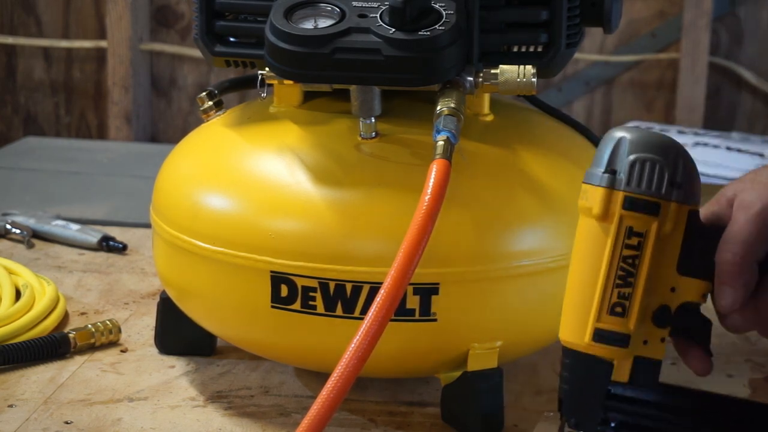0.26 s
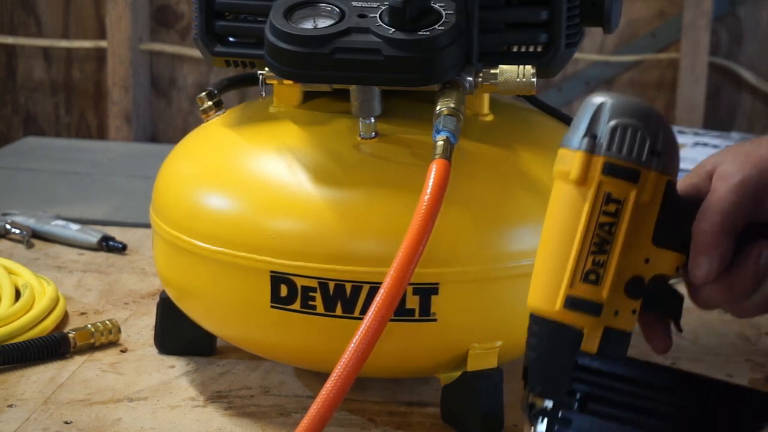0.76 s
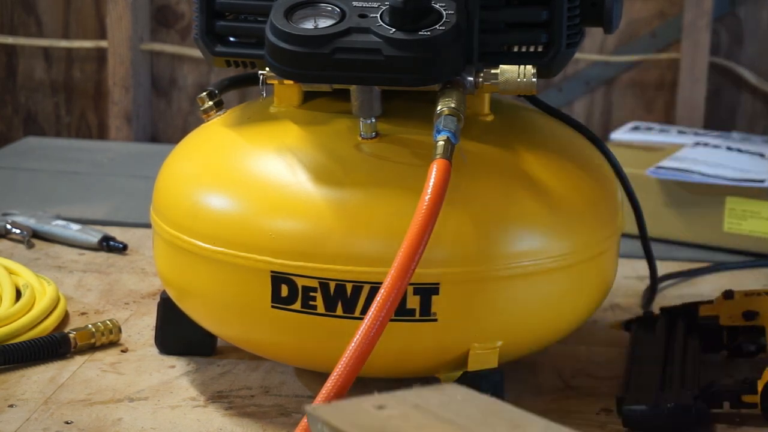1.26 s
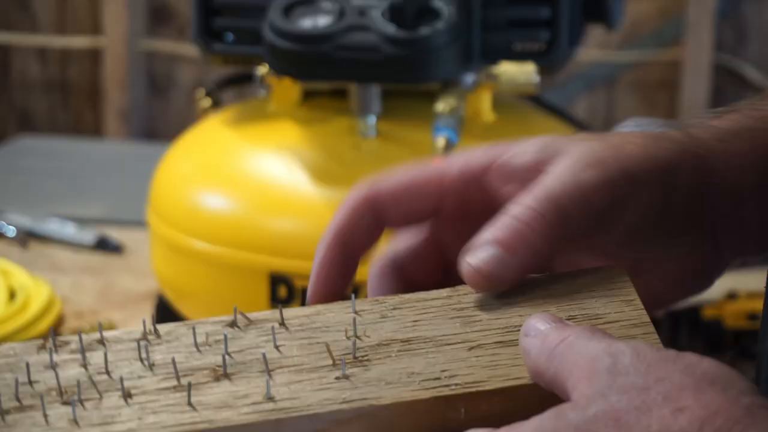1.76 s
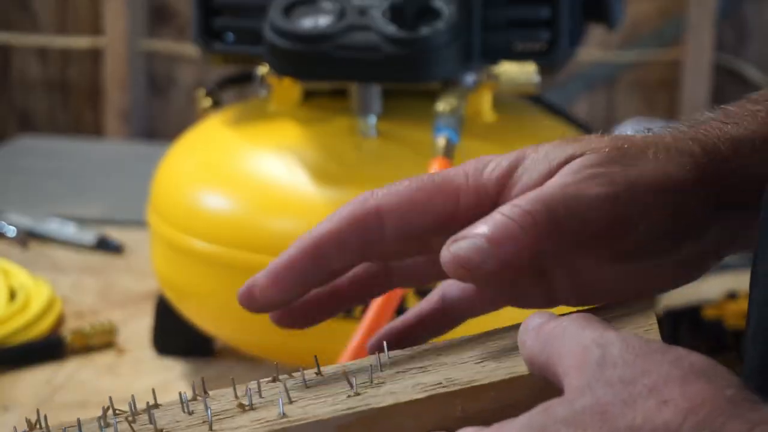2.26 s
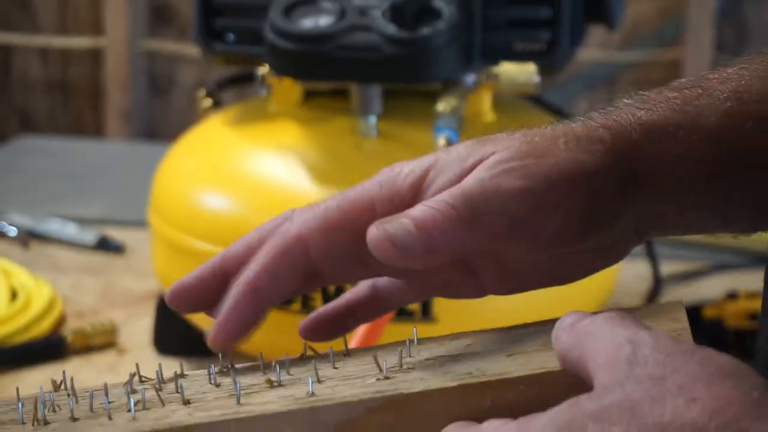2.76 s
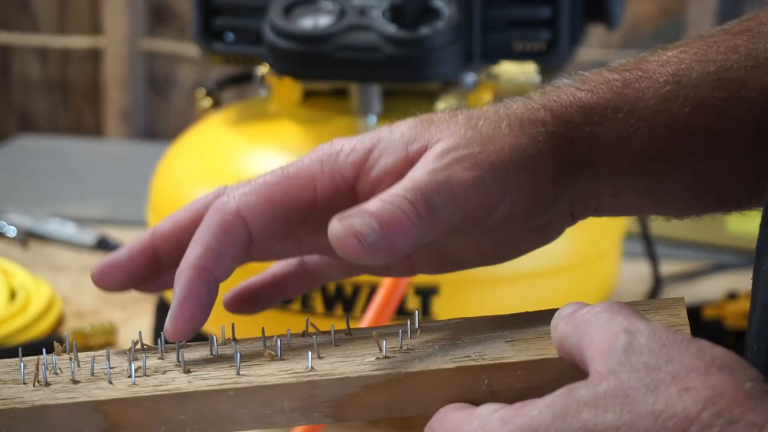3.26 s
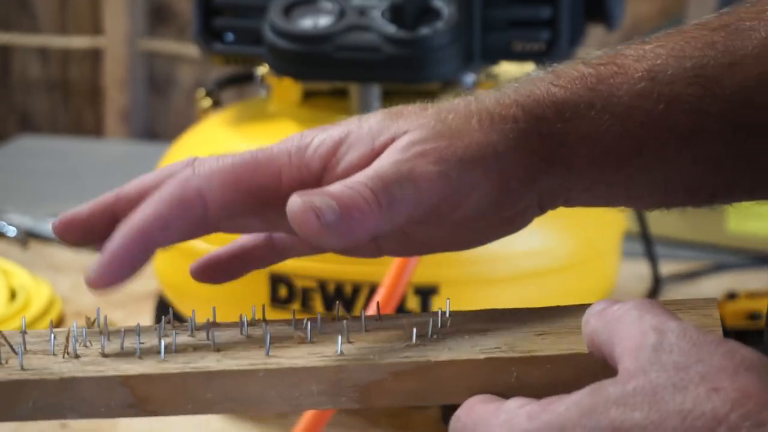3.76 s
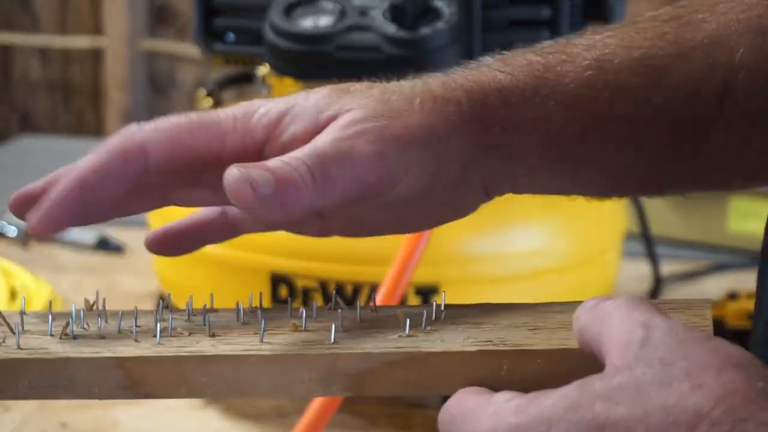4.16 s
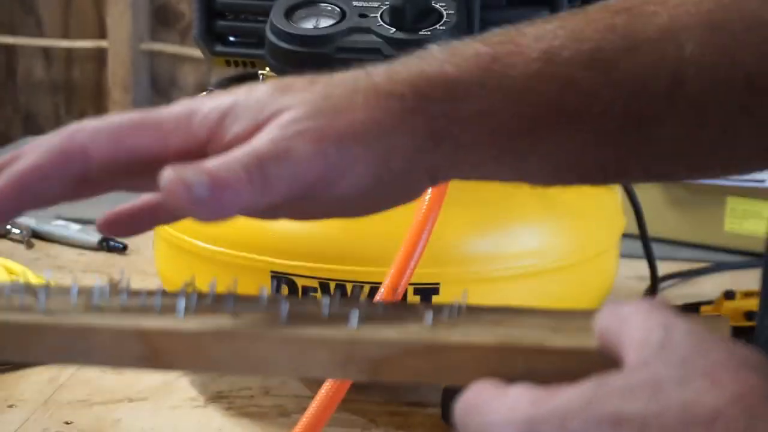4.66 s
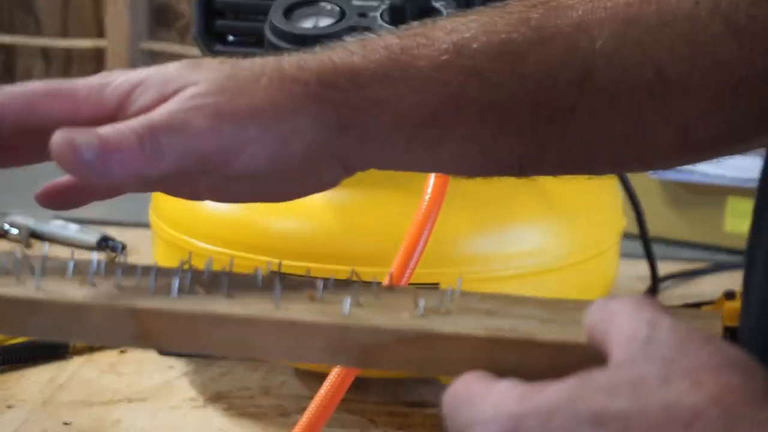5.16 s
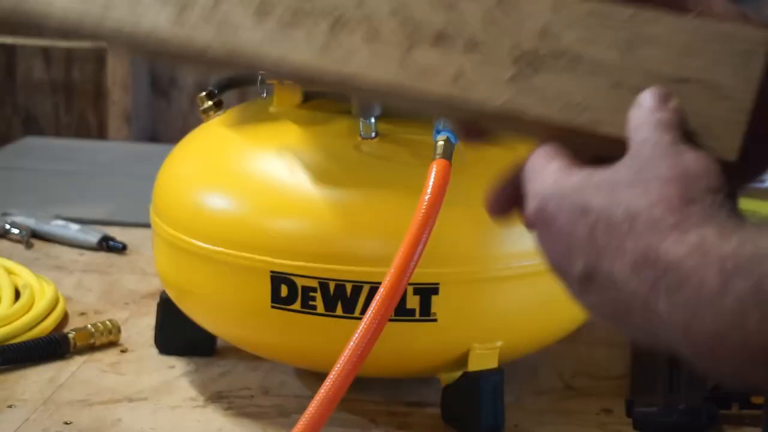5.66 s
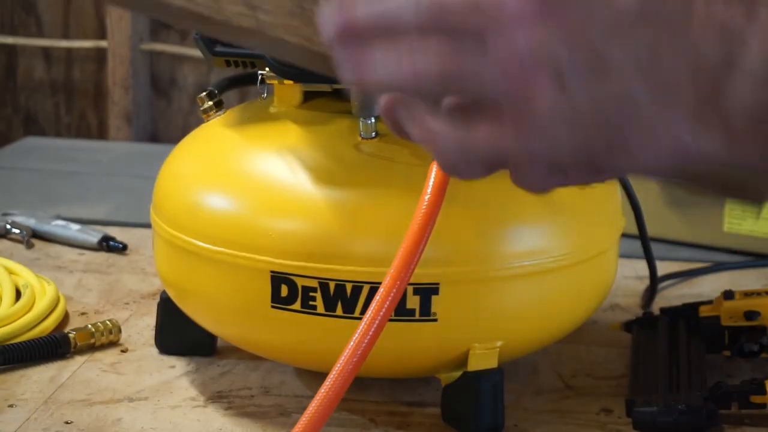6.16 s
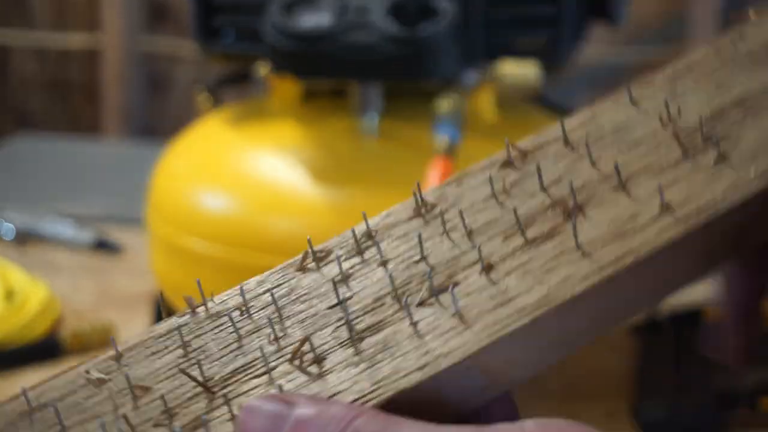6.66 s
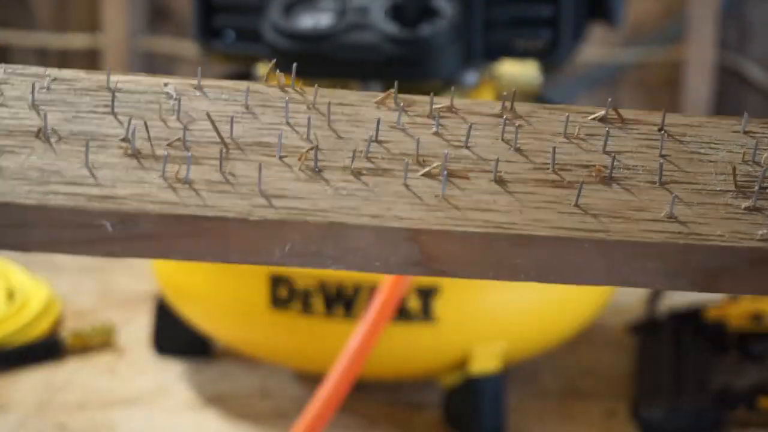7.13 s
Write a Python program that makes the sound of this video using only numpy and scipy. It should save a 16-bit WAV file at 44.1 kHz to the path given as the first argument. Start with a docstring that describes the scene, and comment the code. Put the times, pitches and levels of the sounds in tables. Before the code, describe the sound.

Rapid pneumatic nail shots with bursts of air, then a little air compressor kicks in and buzzes steadily, whistling and hissing to the end.

```python
"""A small workshop: an air nailer fires a quick run of brads into a board, close to the one microphone.
Each shot is a trigger click, a valve tick, the driver's blow with a gush of air, and the piston knocking home:
noise cracks with ringing body modes. Then a small oil-free compressor jolts, spins up and drones on:
multiples of the crank rate make its buzz and whistles, chopped noise its rushing air and hiss.
Behind it the room hums: wavering sine tones over faint coloured noise."""
import sys
import numpy as np
from scipy import signal
from scipy.fft import rfft, irfft
from scipy.io import wavfile
from scipy.ndimage import uniform_filter1d, map_coordinates

SR = 44100
rng = np.random.default_rng(int(sys.argv[2]) if len(sys.argv) > 2 else 0)


def wav_out(sig):
    """Save sig, one row per channel (or a flat mono array), as 16-bit PCM at SR to the path in sys.argv[1]."""
    wavfile.write(sys.argv[1], SR, np.round(np.clip(np.atleast_2d(sig).T, -1, 1) * 32767).astype(np.int16))


N = 325968
T = np.arange(N) / SR  # time of every sample [s]


def undb(db):
    """Decibels to gain."""
    return 10 ** (np.asarray(db) / 20)


def unit(x):
    """Scale to an rms of one."""
    return x / np.sqrt(np.mean(x ** 2))


def curves(table):
    """Each column of a timed table, interpolated sample by sample."""
    s, *columns = np.transpose(table)
    return [np.interp(T, s, column) for column in columns]


def spectrum_db(hz, points):
    """Read (frequency [Hz], level [dB]) points on a log-frequency axis."""
    point_hz, point_db = np.transpose(points)
    return np.interp(np.log(hz + 1), np.log(point_hz), point_db)


def noise(points, bumps=(), size=N):
    """Noise of a given colour at an rms of one, with narrow peaks and notches on top."""
    hz = np.arange(size // 2 + 1) * SR / size
    db = spectrum_db(hz, points)
    for centre_hz, width_hz, bump_db in bumps:
        db = db + bump_db / (1 + (2 * (hz - centre_hz) / width_hz) ** 2)
    white = rfft(rng.standard_normal(size))
    return unit(irfft(white * undb(db), size))


def walk(rate_hz):
    """Smooth random wander with an rms of one."""
    hold = max(int(SR / rate_hz), 2)
    steps = np.repeat(rng.standard_normal(N // hold + 1), hold)
    return unit(uniform_filter1d(steps, hold)[:N])


def fade(t, t60):
    """Exponential decay that starts at t = 0 and falls 60 dB in t60 seconds."""
    return np.exp(-np.log(1000) * np.maximum(t, 0) / t60)


def ramp(start_s, length_s):
    """A straight rise from 0 to 1 that begins at a given time."""
    return np.clip((T - start_s) / length_s, 0, 1)


def add(out, start_s, sound):
    """Mix in the part of a sound that falls after time zero."""
    i = int(start_s * SR)
    sound, i = sound[max(-i, 0):], max(i, 0)
    out[i:i + len(sound)] += sound[:N - i]


def nailer():
    """Trigger, valve, blow and air; the piston comes home and bounces once on its rubber bumper."""
    # shots: (trigger click [s], driver's blow [s], piston home [s], trigger level [dB], blow level [dB])
    shots = [(-.05, -0.023, .005, -40, -26), (0.057, 0.083, .1114, -39, -25),
             (.180, 0.212, .2379, -39, -27), (0.315, .359, .379, -41, -29), (.4507, .488, .5097, -46, -28),
             (.5797, 0.6073, .630, -38.5, -27.5)]
    # colours of trigger, valve, blow, piston and bounce: (frequency [Hz], level [dB])
    click_colour = [(300, -25), (1200, -8), (3200, 4), (6000, -10), (10000, -12), (15500, -2)]
    tick_colour = [(300, -20), (1500, -3.5), (3500, -3), (8000, -11), (13000, 0), (15500, 7)]
    blow_colour = [(150, -25), (900, -20), (1500, -3.5), (2100, -13), (3200, -4), (6000, -2), (8500, -20),
                   (13000, 2), (15500, -1)]
    knock_colour = [(150, -31), (550, -10.5), (1400, -5), (2100, -11.5), (3400, 2), (4800, -6), (8000, -11),
                    (13000, -12), (15500, -6.5)]
    bounce_colour = [(200, -24), (800, -25), (1400, -2.5), (2100, -8), (3500, -8), (6000, -11),
                     (13000, -12), (15500, -13)]
    valve_lead_s, bounce_delay_s = .0078, .0103  # valve tick before the blow, bounce after the piston is home
    valve_db, gush_db, knock_db, bounce_db = -33.5, -30.5, -27, -36.3
    out = np.zeros(N)
    for trigger_s, blow_s, home_s, trigger_db, blow_db in shots:
        click = strike(click_colour, t60=.014, tail_db=-9, tail_t60=.061, ring_db=-10)
        add(out, trigger_s, undb(trigger_db) * click)
        tick = strike(tick_colour, t60=.017, tail_db=-5, tail_t60=.07, ring_db=-5)
        add(out, blow_s - valve_lead_s, undb(valve_db) * tick)
        blow = strike(blow_colour, t60=.025, tail_db=-18, tail_t60=.07, ring_db=-7)
        add(out, blow_s, undb(blow_db) * blow)
        add(out, blow_s, undb(gush_db) * gush(open_s=.037, open_t60=.17, closed_t60=.057))
        knock = strike(knock_colour, t60=.039, tail_db=-15, tail_t60=.1, ring_db=-3)
        add(out, home_s, undb(knock_db) * knock)
        bounce = strike(bounce_colour, t60=.023, tail_db=-7.5, tail_t60=.09, ring_db=5)
        add(out, home_s + bounce_delay_s, undb(bounce_db) * bounce)
    # so small a body radiates no deep bass
    return signal.sosfilt(signal.butter(2, 220, "high", fs=SR, output="sos"), out)


def strike(colour, t60, tail_db, tail_t60, ring_db):
    """A hard contact in the nailer: a crack, the body modes its colour excites and a short tail from the bench."""
    # modes of nailer body and board: (nominal frequency [Hz], level [dB], t60 [s])
    body_modes = [(544, -6, 0.043), (874, -7, 0.033), (1350, -11, 0.028), (1425, 1, 0.025), (1560, -7, .02),
                  (2750, -5, .03), (3340, -5.5, 0.058), (3630, -24, .03), (5810, -11, .06)]
    t = T[:SR // 4]
    crack = noise(colour, size=len(t)) * (fade(t, t60) + undb(tail_db) * fade(t, tail_t60))
    ring = 0
    for hz, db, mode_t60 in body_modes:
        detune = 1 + 0.012 * rng.standard_normal()
        tone = np.sin(2 * np.pi * hz * detune * t)
        ring = ring + undb(db + spectrum_db(hz, colour)) * fade(t, mode_t60) * tone
    return crack + undb(ring_db) * ring


def gush(open_s, open_t60, closed_t60):
    """Air blows off while the valve is open, then dies away quickly."""
    # colour of the exhaust: (frequency [Hz], level [dB])
    exhaust_colour = [(300, -33), (1500, -7.5), (4500, -5.5), (6500, -3), (8500, -7), (11000, -2),
                      (13400, 2.5), (15500, -11)]
    t = T[:SR // 4]
    envelope = fade(np.minimum(t, open_s), open_t60) * fade(t - open_s, closed_t60)
    return noise(exhaust_colour, size=len(t)) * envelope


def compressor():
    """The crank spins up; every turn pumps a pulse, slaps the reed valves and lets air rush through."""
    # crank speed once running: (time [s], turns per second [Hz])
    crank_speed = [(0.9, 201.7), (1.2, 203.3), (2.38, 203.4), (2.66, 204.4), (3.63, 205), (6.8, 205.3),
                   (7.3, 205.8)]
    cruise_hz, = curves(crank_speed)
    mean_hz = np.mean(cruise_hz)
    # the motor kicks at once to a share of its speed, then closes in on the rest
    start_s, kick_share, spin_up_s = .707, .425, .038
    running_s = np.maximum(T - start_s, 0)
    speed = 1 - (1 - kick_share) * np.exp(-running_s / spin_up_s)
    swell = 1 - np.exp(-running_s / .029)  # the sound of pumping builds over the first turns [s]
    # back pressure builds after a delay and levels off
    load_from_s, load_rise_s = 1.25, 1.5
    pressure = 1 - np.exp(-np.maximum(T - load_from_s, 0) / load_rise_s)
    board = board_in_front()
    turns = np.cumsum(cruise_hz * speed) / SR
    # the valves open a little early or late, which frays the high multiples
    valve = turns + .0008 * walk(150) + .0010 * walk(25)

    pulse = pump_note(valve, speed, cruise_hz, pressure, waver_db=0.82, smear=.03)
    pump = undb(-31.5 + 0.55 * board) * pulse  # the board reinforces the buzz
    upper = np.arange(30, 78)  # crank multiples above those of the pump note
    reeds = undb(-42) * reed_ring(valve, upper, mean_hz)
    whistles = valve_whistles(valve, upper, mean_hz)
    strokes = stroke_gain(turns)
    air = undb(-28.5 + 0.06 * board) * air_rush(strokes)
    hiss = undb(-35 - 4 * board) * slot_hiss(strokes, pressure)  # the board screens the hiss
    # the reeds only sing out once the pump is nearly up to speed
    return swell ** 1.6 * pump + speed ** 8 * (reeds + whistles) + swell ** 1.5 * (air + hiss)


def board_in_front():
    """A board is held in front of the pump for a while: 0 when away, 1 when in place."""
    in_s, out_s, move_s = 1.49, 5.55, 0.24  # the moves are centred on these times
    return ramp(in_s - move_s / 2, move_s) - ramp(out_s - move_s / 2, move_s)


def pump_note(turns, speed, cruise_hz, pressure, waver_db, smear):
    """One pulse a turn through the pump's fixed resonances: in the spin-up its multiples sweep across the peaks."""
    # crank multiples: (multiple [turns], level at low tank pressure [dB], level at high tank pressure [dB])
    pump_orders = [(1, -20.5, -20), (2, -24, -23), (3, -22, -21.5), (4, -14.5, -26), (5, -7.5, -8),
                   (6, -10, -8.5), (7, -18.5, -17), (8, 0.4, 0.34), (9, -4.5, -6), (10, -16.5, -9),
                   (11, -22, -34), (12, -19, -17.5), (13, -7, -13), (14, -27, -23), (15, -14.5, -12),
                   (16, -6, -7.5), (17, -7, -4.5), (18, -11.5, -13.5), (19, -20, -13), (20, -12, -13.7),
                   (21, -28, -21), (22, -11, -14), (23, -11.8, -28), (24, -11, -17.5), (25, -35, -42),
                   (26, -22, -30), (27, -23, -16), (28, -34, -21), (29, -27, -18.5)]
    orders, low_db, high_db = np.transpose(pump_orders)
    orders = np.rint(orders)
    # a sharp casing resonance flares when a multiple comes near it
    flare_hz, flare_width_hz = 1730, 70
    flare_db = 8 * speed ** 4  # the early multiples pass too fast to build it up
    sway = [waver_db * walk(2.48) for _ in range(5)]
    out = 0
    for i, k in enumerate(orders):
        db = np.interp(k * speed, orders, low_db)
        db = db + pressure * (high_db[i] - low_db[i]) + sway[i % len(sway)]
        off_peak = (k * speed * cruise_hz - flare_hz) / (flare_width_hz / 2)
        db = db + flare_db * np.exp(-off_peak ** 2)
        # highs cross the metal casing sooner than lows, which smears the pulse over the turn
        lead = smear * k ** 2 / 2 + 0.12 * rng.standard_normal()
        out = out + undb(db) * np.sin(2 * np.pi * (k * turns + lead))
    return np.sqrt(2) * out


def buzz(turns, orders, db, waver, waver_hz):
    """A stack of crank multiples at an rms of one; shifting reflections make each one waver on its own."""
    size = 4096  # samples in the stored waveform of one turn
    position = (turns % 1 * size).astype(int)
    out = 0
    for weight in (1, waver * walk(waver_hz), waver * walk(waver_hz)):
        lines = np.zeros(size // 2 + 1, complex)
        lines[orders] = undb(db) * np.exp(2j * np.pi * rng.random(len(orders)))
        out = out + weight * irfft(lines, size)[position]
    return unit(out)


def reed_ring(valve, orders, crank_hz):
    """The reed valves, slapped every turn, ring on the upper crank multiples."""
    # colour of the ring: (frequency [Hz], level [dB])
    reed_colour = [(6150, -7), (6550, -2.5), (7200, -2), (7800, -31), (8200, -9), (8850, -11), (9650, 1),
                   (10100, 3), (10700, -5), (12400, -13), (12850, -5), (13400, -5), (14500, -2),
                   (15700, -4)]
    return buzz(valve, orders, spectrum_db(orders * crank_hz, reed_colour), waver=0.27, waver_hz=1.57)


def valve_whistles(valve, orders, crank_hz):
    """As the load changes, each whistle lifts the few crank multiples near its centre, holds and dies away."""
    # whistles: (start [s], end [s], centre [Hz], width [Hz], level [dB], release [s])
    whistle_table = [(.8, 1.3, 9130, 170, -38.5, .4), (2.0, 7.4, 9290, 600, -39.7, .4),
                     (1.35, 7.2, 10385, 290, -38.7, .8), (1.0, 3.8, 12810, 450, -40.8, 2.6)]
    attack_s = .3
    out = 0
    for start_s, end_s, hz, width_hz, db, release_s in whistle_table:
        envelope = ramp(start_s, attack_s) * (1 - ramp(end_s, release_s))
        off_centre = 2 * (orders * crank_hz - hz) / width_hz
        peak_db = -10 * np.log10(1 + off_centre ** 6)
        out = out + undb(db) * envelope * buzz(valve, orders, peak_db, waver=0.22, waver_hz=5)
    return out


def stroke_gain(turns):
    """Intake and delivery strokes chop the air once and twice a turn, with a little random flutter."""
    crank = 2 * np.pi * (turns + 0.36)  # angle, shifted by a share of a turn
    return undb(1.6 * np.cos(crank) + 1.5 * np.cos(2 * crank) + .5 * walk(40))


def air_rush(strokes):
    """Air rushes through pump and fan, coloured by the casing and chopped by the strokes."""
    # colour of the rushing air: (frequency [Hz], level [dB])
    air_colour = [(60, -58), (200, -15.5), (310, -25), (750, -18), (850, -11), (1150, -7), (2400, -10.5),
                  (3400, -4.5), (4600, -1.5), (6200, -11.5), (7600, -14), (9500, -15.5), (11200, -16.5),
                  (15700, -15)]
    # peaks and notches of the pump casing: (centre [Hz], width [Hz], level [dB])
    casing = [(910, 30, 1), (1457, 94, -10.5), (1701, 333, 12), (1990, 60, -5), (2104, 143, 7.5),
              (2733, 290, 4), (3005, 89, -12.5), (3120, 92, 4.5), (3460, 130, 2.5), (3950, 150, -3),
              (12800, 450, 8)]
    return bench_echoes(noise(air_colour, casing) * strokes, echo_db=-12.5)


def slot_hiss(strokes, pressure):
    """Air hisses through the valve slots, its pitch rising as the pressure builds."""
    # colour of the hiss at full pressure: (frequency [Hz], level [dB])
    slot_colour = [(5000, -40), (7300, -10), (8250, 3.5), (8800, 0.5), (9400, 3), (10400, 4), (10800, -13),
                   (12000, -5.5), (15500, -11.5)]
    pitch = 1 - .06 * (1 - pressure)  # share of the full-pressure pitch
    jet = map_coordinates(noise(slot_colour), [np.cumsum(pitch)], mode="mirror")
    return bench_echoes(jet * strokes, echo_db=-13)


def bench_echoes(x, echo_db, count=8):
    """Small hard things on the bench throw the treble back within 2 to 12.5 ms and comb it finely."""
    lags = rng.integers(SR // 500, SR // 80, count)
    treble = signal.sosfilt(signal.butter(2, 5000, "high", fs=SR, output="sos"), x)
    echoes = sum(np.roll(treble, lag) for lag in lags)
    return unit(x + undb(echo_db) * echoes)


def start_jolt():
    """The switch closes and the first compression strokes clack in the pump: noise bursts with a ringing tone."""
    # colour of the clack: (frequency [Hz], level [dB])
    colour = [(100, -40), (300, -25), (1000, -10), (1700, 0), (3500, -5), (5200, 4), (7000, -21), (15500, -24)]
    out, t = np.zeros(N), T[:SR // 4]
    # (time [s], clack level [dB], ring level [dB])
    for s, db, ring_db in [(.7095, -36, -46), (.7187, -37, -30), (.7283, -34, -40)]:
        add(out, s, undb(db) * fade(t, 0.048) * noise(colour, size=len(t)))
        add(out, s, undb(ring_db) * fade(t, 0.093) * np.sin(2 * np.pi * 2640 * t))
    return out


def workshop():
    """Mains and fan hum, each tone wavering slightly in level, over faint room air."""
    # hum tones: (frequency [Hz], mean rms level [dB])
    hum_tones = [(119.8, -59), (239.8, -57), (280.6, -62.5), (561.5, -56), (841, -71), (1124, -62),
                 (1599, -67), (1970, -69)]
    # colour of the room air: (frequency [Hz], level [dB])
    room_colour = [(25, -11), (100, -0.5), (220, -16), (500, -4), (800, -12), (1400, -1), (2500, -9),
                   (4000, -7), (7000, -19), (15500, -28)]
    hum = 0
    for hz, db in hum_tones:
        tone = np.sqrt(2) * np.sin(2 * np.pi * (hz * T + rng.random()))
        hum = hum + undb(db + 0.45 * walk(2.4)) * tone
    return hum + undb(-58.5) * noise(room_colour)


def scene():
    """One microphone, the same in both ears."""
    mono = nailer() + compressor() + start_jolt() + workshop()
    return np.array([mono, mono])


def record(dry):
    """The recorder cuts the top, steeply above 15720 Hz."""
    return signal.sosfilt(signal.ellip(10, .1, 80, 15720, fs=SR, output="sos"), dry)


dry = scene()
out = record(dry)
wav_out(out)
```